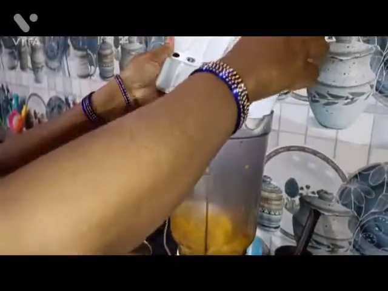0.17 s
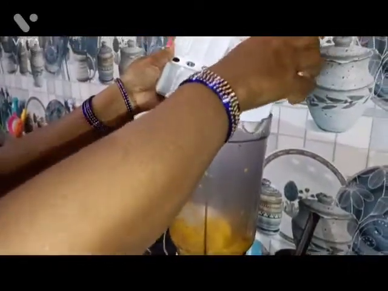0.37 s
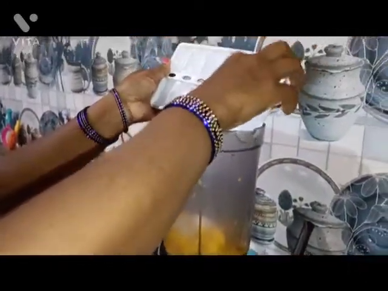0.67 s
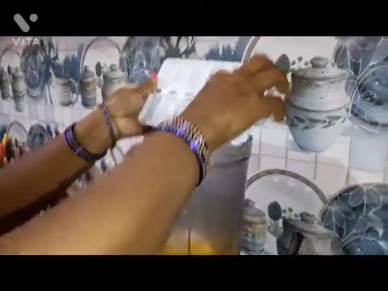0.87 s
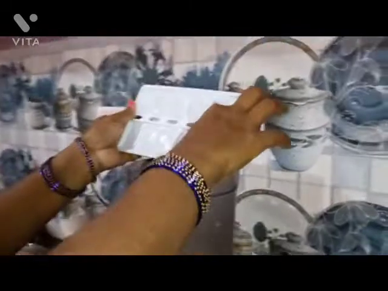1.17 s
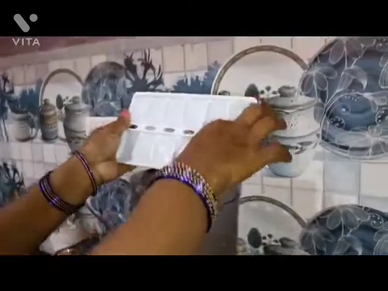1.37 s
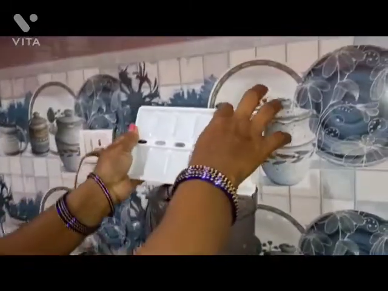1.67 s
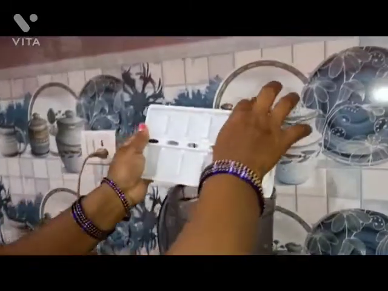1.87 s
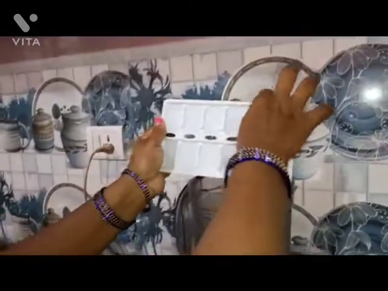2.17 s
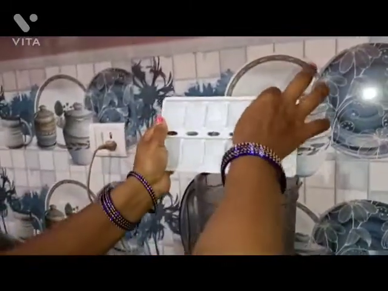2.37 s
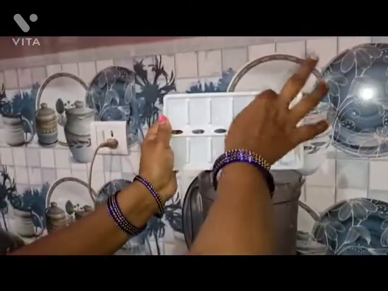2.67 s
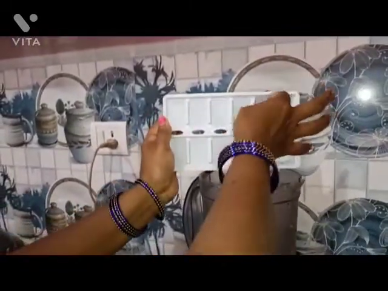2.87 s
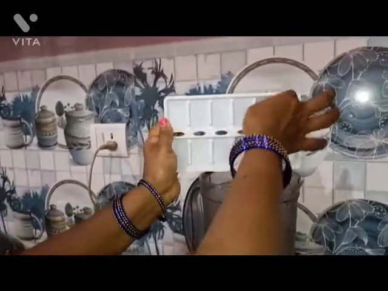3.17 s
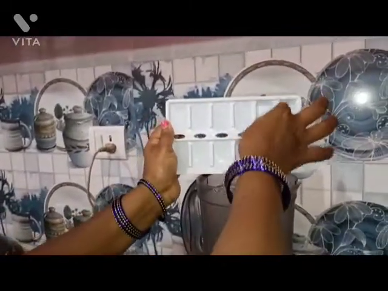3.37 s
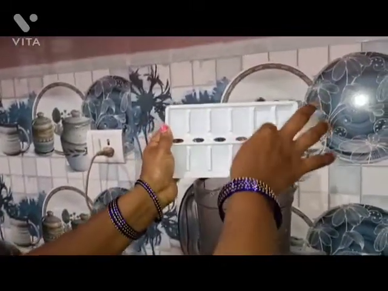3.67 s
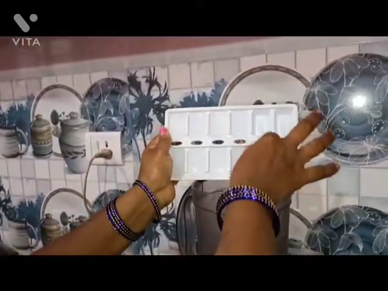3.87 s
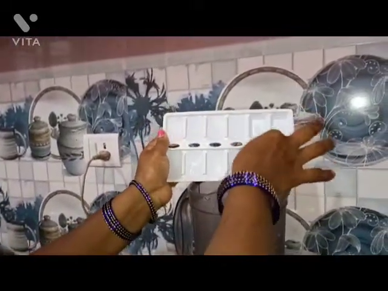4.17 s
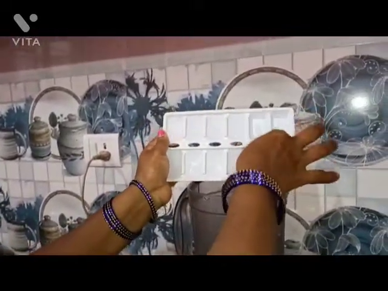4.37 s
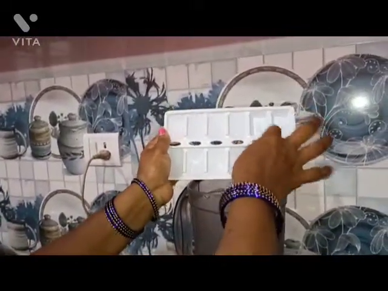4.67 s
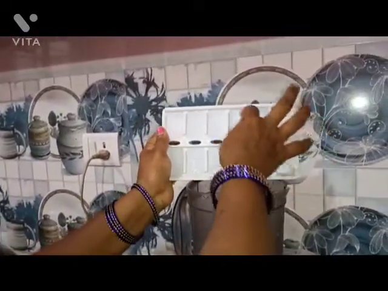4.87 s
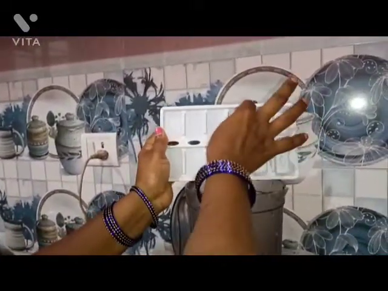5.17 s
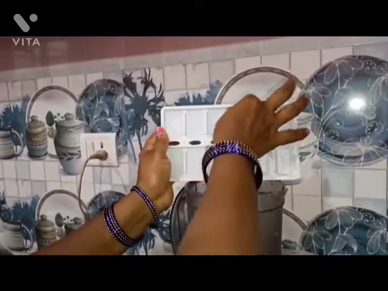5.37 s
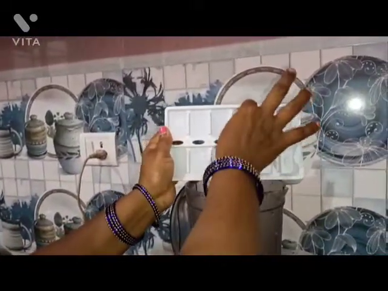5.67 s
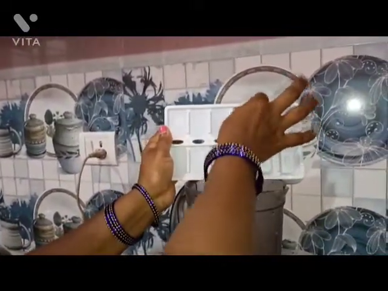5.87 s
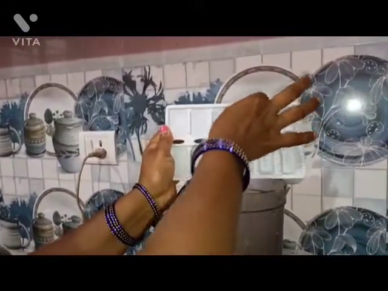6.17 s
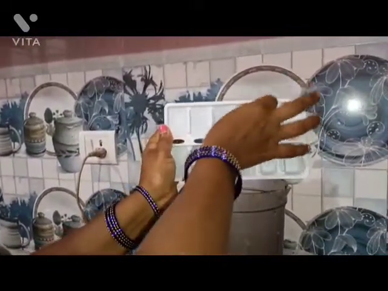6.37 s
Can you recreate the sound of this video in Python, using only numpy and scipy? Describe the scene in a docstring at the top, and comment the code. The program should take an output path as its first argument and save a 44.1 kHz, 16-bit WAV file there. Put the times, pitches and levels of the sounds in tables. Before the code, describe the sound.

Ice cubes clatter into a plastic blender jar in four short, bright bursts. Between them, hands creak and rustle on a plastic ice tray, which snaps sharply as it is twisted and the ice lets go. Midway, cubes touch the steel blade with a faint, thin ring. Small ticks and creaks finish it. A phone microphone picks up the tiled kitchen's echo and a low hum.

```python
"""Ice cubes crack out of a plastic tray and clatter into a plastic blender jar in a tiled kitchen.
Each blow is a short chatter of contacts that rings jar and cube; the tiles add a bright tail.
Two cubes touch the steel blade and leave a thin ring. Hands creak and rustle on the tray
over a low household hum. A phone with two unlike ports listens."""
import sys
import numpy as np
from scipy import signal
from scipy.fft import rfft, irfft, next_fast_len
from scipy.io import wavfile
from scipy.ndimage import uniform_filter1d

SR = 44100
rng = np.random.default_rng(int(sys.argv[2]) if len(sys.argv) > 2 else 0)


def transcribe(u):
    """Save the signal u as a 16-bit wav file named by the first command-line argument.

    u: samples, shape (n,) or (channels, n), limited to [-1, 1]; the rate is SR.
    q: integer samples, one column per channel.
    """
    v = np.clip(np.atleast_2d(u).T, -1, 1)
    q = np.round(v * 32767).astype(np.int16)
    wavfile.write(sys.argv[1], SR, q)


N = 286958
LEAD_SAMPLES = 4410  # run-in before time zero

# Jar and ice modes, one list per family: air boom, hollow knock, body, wall, brittle crack, sharp tick.
# Each row: frequency in Hz, width in Hz, level within the family in dB.
MODE_FAMILIES = [
    [(491, 28, -2.5), (233, 60, -18.5)],
    [(1109, 77, 3.5), (1195, 174, 1)],
    [(1506, 260, -3.5), (1890, 250, 0.5), (2014, 197, -1), (2214, 218, 3.5)],
    [(2670, 310, -1.5), (2940, 450, 7), (3470, 500, -3.5), (4700, 1800, -18.5)],
    [(5720, 880, -9.5), (5970, 760, 2.5), (6760, 1200, 4)],
    [(9220, 1440, 9.5), (10170, 2800, 4.5), (14550, 2600, -6)],
]
# Cubes striking the jar and each other. Each row: start in seconds, strength in dB, ring in Hz,
# knock, body and crack in dB relative to strength, chatter time in ms, room send in dB.
CUBE_HITS = [(-.015, -10.5, 3820, -20, -16, -9, 1.7, 0.5), (0.1172, -3.5, 3670, -12.5, -8, -10, 2.6, -0.5),
             (0.1216, -7, 3080, -11.5, -31.5, -25, 2.9, 1), (0.2061, -7, 2170, -17.5, -10, -9.5, 4.1, 1.5),
             (0.2223, -17, 2770, -40.5, -27.5, -14, 2.6, 1), (1.3925, -1, 3110, -23, -15.5, -22, 4, -0.5),
             (1.4133, -10.5, 3800, -41, -50, -6.5, 3, 4.5), (1.4228, -18, 3550, -14, -22, -16, 3.7, 4),
             (1.4344, -14, 2870, -27, -40, -6.5, 8, 3), (1.439, -14, 3600, -36, -25.5, -7.5, 5.2, 4),
             (1.4522, -13.5, 3900, -12.5, -11, -24, 2, 1.5), (1.4621, -2, 3230, -33, -18.5, -21, 4.4, 1),
             (1.4778, -10, 3870, -40, -17, -31, 6.3, 1), (1.483, -18, 3760, -8, -3.5, -0.5, 5.6, -12),
             (1.4899, -7, 3650, -55, -20, -39, 1.3, -4.5), (1.5194, -23, 3900, -34, -15, -24, 1.9, 0),
             (1.5413, -26, 3740, -42, -9, -27, 1.6, 10.5),
             (1.5702, -13.5, 3000, -18, -11.5, -19.5, 3.5, 2.5),
             (1.6444, -21.5, 3200, -7, -8.5, -15.5, 1.8, 0.5),
             (1.927, -20.5, 3720, -31, -19, -19, 1.5, -7.5), (3.2942, -7, 2780, -16.5, -14, -19, 2.3, 0.5),
             (3.327, -7, 3060, -27, -11, -17, 5.4, -0.5), (3.3564, -25, 3080, -30, -15, -26, 2.6, -7),
             (3.4023, -6, 3050, -33, -9.5, -56, 2.4, -5), (3.4086, -33.5, 3000, -5.5, -26, 2, 1.6, -5),
             (3.696, -37.5, 3150, -22.5, -16, -27, 2.1, -9),
             (4.5426, -7.5, 2850, -18.5, -29, -14.5, 6.1, -6), (4.555, -20, 2520, -31, -5, -6, 2, 9.5),
             (4.5721, 0.5, 3300, -25, -19.5, -59, 2.5, 0.5), (4.5855, -5, 2960, -19, -14.5, -44, 3.3, -21),
             (4.601, -10, 2950, -29, -7.5, -16, 1.6, -1.5), (4.663, -10.5, 3080, -30, -42, -30, 0.97, -3),
             (4.7406, -25.5, 3980, -43, -19, -27, 3.3, 5.5), (4.9414, -27.5, 3670, -21, -29, -41, 3.2, -3),
             (4.99, -38, 3490, -18, -26, -16, 2.3, -4), (5.0075, -21, 3670, -24.5, -29, -30, 5.1, -7)]
# Twisted tray snapping as ice lets go. Each row: as in CUBE_HITS.
TRAY_SNAPS = [(0.491, -40.5, 3780, -7, -19, -3.5, 4, 8.5), (0.871, -44.5, 2440, -7, -28.5, -14, 4.2, -1),
              (1.301, -8, 3700, -21, -16.5, -9.5, 7.8, 1.5), (1.3112, -7, 4770, -29, -15.5, -11, 0.47, -1),
              (2.0804, -42, 3750, -26, -22, -10, 2.9, -9), (2.42, -40.5, 3630, -23, -25, -25, 5.8, 0),
              (2.7423, -43.5, 3660, -22, -9.5, -4.5, 6.7, 9.5), (3.1178, -36, 2540, -25, -16, -16, 3.6, 3),
              (3.1662, -12, 3310, -21, -15, -45.5, 1, -8), (3.1708, -10.5, 3370, -22, -13.5, -43, 0.89, -4),
              (3.189, -34, 3770, -35, -39, -2, 11, 0.5), (4.2488, -32.5, 3620, -23, -33, -7.5, 4.1, -1.5),
              (4.3899, -40, 3520, -19, -24, -20, 2.5, 3), (4.4394, -10, 3220, -19, -27, -13.5, 1.9, -2.5),
              (5.1627, -35, 3800, -42, -35, -11.5, 3.1, 3.5), (5.3194, -45, 3920, -30, -25, -6, 3.7, 1),
              (5.517, -41.5, 3700, -15, -28, -19, 4.9, -11), (5.685, -37, 2360, -34, -7, -38, 2.7, -11),
              (5.7014, -27.5, 2420, -39, -18, -42, 6.2, 3), (5.9628, -23.5, 3400, -22, -20, -26, 2.3, -8.5),
              (5.979, -42, 3640, -27, -22, -7, 1.9, 5), (6.1692, -33.5, 2600, -23, -18, -25, 6.8, 2.5),
              (6.2727, -31, 3040, -29, -11.5, -33, 5.8, 4.5), (6.3203, -28, 2420, -20, -11, -39, 8, 3),
              (6.426, -35.5, 2890, -13, -32, -17, 3.5, -4.5)]
# Tiled room decay. Each row: frequency in Hz, T60 in seconds.
ROOM_T60_S = [(250, 1), (660, 0.56), (1740, 0.65), (4590, 0.67), (8000, 0.58), (12100, 0.41)]
# Hum spectrum. Each row: frequency in Hz, relative density in dB.
HUM_SPECTRUM_DB = [(12, -16), (45, -6.5), (107, -2), (172, -10), (255, -2), (367, -8), (459, -7),
                   (825, -12.5), (1030, -9.5), (1330, -15), (3440, -19), (5380, -27.5), (7520, -35.5),
                   (12100, -36), (16000, -38.5)]
# Hum stereo image. Each row: frequency in Hz, left-right correlation.
HUM_CORRELATION = [(25, 0.87), (60, 0.96), (400, 0.92), (800, 0.27), (1500, 0.084), (4000, 0.054),
                   (9000, 0.9)]
# Appliance tones. Each row: frequency in Hz, width in Hz, level in dB.
DRONES = [(25.4, 14, -63.5), (86, 2.4, -64), (246.5, 11.5, -57.5), (438.5, 126, -62)]
# Grip shifts on the tray. Each row: peak time, swell and fade in seconds, creak and rustle in dB.
GRIPS = [(0.502, 0.056, 0.33, -43, -41.5), (0.872, 0.0053, 0.05, -71, -48), (1.09, 0.3, 1, -57.5, -57.5),
         (1.28, 0.045, 0.25, -50.5, -51), (2.076, .015, 0.17, -61, -62.5), (2.29, .05, .9, -60, -68),
         (2.57, .3, 0.11, -56.5, -68), (2.752, 0.038, 0.63, -52, -66.5), (3.13, 0.053, 0.21, -45, -56),
         (3.7, 0.022, 0.15, -47, -65), (4.249, 0.0075, 0.12, -41, -38), (4.42, 0.14, 0.13, -50, -60),
         (5.166, 0.017, 0.19, -48.5, -56), (5.364, 0.13, 0.14, -54.5, -55), (5.52, 0.022, .05, -63, -56),
         (5.69, 0.023, 0.26, -42.5, -62), (5.79, .04, 0.12, -59, -80), (5.845, .01, 0.055, -72, -65),
         (5.964, 0.0062, 0.14, -46, -37.5), (6.03, 0.059, 0.22, -83, -52), (6.25, 0.35, 1, -50, -63.5)]
# Creak and dry rustle spectra. Each row: frequency in Hz, relative density in dB.
CREAK_SPECTRUM_DB = [(1000, -9), (1800, -4.5), (3200, -1.5), (4500, -7), (7000, -14), (9000, -65)]
RUSTLE_SPECTRUM_DB = [(3000, -31), (6000, 14.5), (9000, 13), (13000, 10.5), (15300, 6), (16000, -19)]
# Cubes touching the blade. Each row: start in seconds, level in dB.
BLADE_HITS = [(3.328, -34), (3.404, -33)]
# Steel blade modes. Each row: frequency in Hz, width in Hz, relative level in dB.
BLADE_MODES = [(3105, 3.2, -1), (3150, 5, -3)]
# Port mismatch. Each row: frequency in Hz, left over right in dB.
PORT_BALANCE_DB = [(60, -2.5), (110, 2), (200, -0.5), (380, -2), (700, -1.5), (1290, -1.5), (2380, 6.5),
                   (4400, 11.5), (8120, -2), (15000, 4.5)]
# Port cavity response with a notch. Each row: frequency in Hz, gain in dB.
PORT_CAVITY_DB = [(5500, -4), (6700, -4), (7400, -10.5), (8300, 0.5), (14000, -3), (15600, -10)]


def gain(db):
    return 10 ** (np.asarray(db) / 20)


def unit_rms(x):
    return x / np.sqrt(np.mean(x ** 2) + 1e-20)


def unit_energy(x):
    return x / np.linalg.norm(x, axis=-1, keepdims=True)


def lookup(table, hz):
    """Interpolate over log frequency."""
    table_hz, values = np.transpose(table)
    return np.interp(np.log(hz + 1), np.log(table_hz + 1), values)


def equalise(x, table, db_scale=1):
    """Filter by a (Hz, dB) table."""
    size = next_fast_len(x.shape[-1])
    response = gain(db_scale * lookup(table, np.fft.rfftfreq(size, 1 / SR)))
    return irfft(rfft(x, size) * response, size)[..., :x.shape[-1]]


def highpass(x, hz):
    return signal.sosfilt(signal.butter(5, hz, "high", fs=SR, output="sos"), x)


def mode(hz, width_hz, t):
    return np.sin(2 * np.pi * hz * t) * np.exp(-np.pi * width_hz * t)


def blow(ring_hz, ring_ms, chatter_ms):
    """Uneven contacts swell, die and ring the modes. One unit-energy stereo signal per family."""
    t = np.arange(2048) / SR
    contact_ms, rise_ms = t[:1024] * 1000, 0.4
    force = (1 - np.exp(-contact_ms / rise_ms)) * np.exp(-contact_ms / chatter_ms)
    size, chance = rng.standard_normal((2, 2, 1024))
    shared, far_only = size * (abs(chance) > 1) * force
    contacts = np.array([shared, 0.4 * shared + 0.6 * far_only])  # near port, far port
    families = np.zeros((len(MODE_FAMILIES), len(t)))
    for family, modes in zip(families, MODE_FAMILIES):
        for hz, width_hz, db in modes:
            spot = rng.standard_normal()  # strike point weights and shifts the mode
            family += gain(db + 2 * spot) * mode(hz * (1 + 0.02 * spot), width_hz, t)
    piece_ring = mode(ring_hz, 1000 / np.pi / ring_ms, t)
    families[3] = unit_energy(families[3]) + gain(11) * unit_energy(piece_ring)  # wall + struck piece
    return unit_energy(signal.fftconvolve(families[:, None], contacts[None], axes=2))


def clatter(hits, base_ring_ms, boom_re_knock_db, boom_loss_db_per_s):
    """Series of blows. Returns direct stereo and three room sends, used in turn."""
    samples = LEAD_SAMPLES + N + SR
    direct, sends = np.zeros((2, samples)), np.zeros((3, samples))
    for k, (start_s, db, ring_hz, knock_db, body_db, crack_db, chatter_ms, send_db) in enumerate(hits):
        ring_ms = base_ring_ms - 0.03 * db  # gentler blows ring longer
        boom, knock, body, wall, crack, tick = blow(ring_hz, ring_ms, chatter_ms)
        boom_db = knock_db + boom_re_knock_db - boom_loss_db_per_s * start_s
        # Small pieces radiate no bass.
        bright = gain(body_db) * highpass(body, 1300) + gain(-11) * highpass(wall, 2100)
        bright += gain(crack_db) * (highpass(crack, 4200) + gain(-7) * highpass(tick, 7000))
        low = gain(boom_db) * highpass(boom[0], 215) + gain(knock_db) * highpass(knock, 940)
        strength = gain(db) * np.sqrt(0.01 * SR)  # unit energy to rms over 10 ms
        at = LEAD_SAMPLES + round(start_s * SR)
        span = slice(at, at + low.shape[1])
        direct[:, span] += strength * (bright + low)
        sends[k % 3, span] += strength * gain(send_db) * (bright + gain(-3.5) * low)[0]
    return direct, sends


def cubes_in_jar():
    """Cubes hit the jar and each other; the air boom dulls as the jar fills."""
    return clatter(CUBE_HITS, base_ring_ms=0.77, boom_re_knock_db=-10.5, boom_loss_db_per_s=3.5)


def kitchen(sends):
    """Tile echoes: sparse taps of random sign, each band dying at its own rate."""
    t = np.arange(SR) / SR
    slots = np.arange(130, SR - 12, 12)
    at = slots + rng.integers(0, 12, (3, 2, len(slots)))
    taps = np.zeros((3, 2, SR))
    np.put_along_axis(taps, at, rng.choice([-1., 1.], at.shape), 2)
    taps[:, 1] = 0.15 * taps[:, 0] + 1.85 * taps[:, 1]
    hz, frame_s, bands = signal.stft(taps, SR, nperseg=256)
    bands = bands * gain(-60 * frame_s / lookup(ROOM_T60_S, hz)[:, None])
    tail = signal.istft(bands, SR, nperseg=256)[1][..., :SR]
    build_up = 1 - np.exp(-t / 0.0027)
    facing_wall = 0.96 * np.exp(-((t - 0.016) / 0.0062) ** 2)
    clumps_db = 0.5 * unit_rms(uniform_filter1d(rng.standard_normal((3, 1, SR)), size=260))
    tail = unit_energy(tail * (build_up + facing_wall) * gain(clumps_db))
    return signal.fftconvolve(sends[:, None], tail, axes=2).sum(0)


def household_hum():
    """Patchy low noise plus fuzzy appliance drones."""
    t, hz = np.arange(N) / SR, np.fft.rfftfreq(1024, 1 / SR)
    left_re, left_im, side_re, side_im, patches = rng.standard_normal((N // 256 + 5, 513, 5)).T
    patches_db = 1.8 * unit_rms(uniform_filter1d(uniform_filter1d(patches, 10, axis=0), 12, axis=1))
    correlation = lookup(HUM_CORRELATION, hz)[:, None]
    left = left_re + 1j * left_im
    right = correlation * left + np.sqrt(1 - correlation ** 2) * (side_re + 1j * side_im)
    bands = np.array([left, right]) * gain(lookup(HUM_SPECTRUM_DB, hz)[:, None] + patches_db)
    out = gain(-49.5) * unit_rms(signal.istft(bands, nperseg=1024, noverlap=768)[1][:, :N])
    for drone_hz, width_hz, db in DRONES:
        pole = np.exp(-np.pi * width_hz / SR)
        waver = signal.lfilter([1], [1, -2 * pole, pole ** 2], rng.standard_normal((2, N)))
        phase = 2 * np.pi * drone_hz * t
        out += gain(db) * unit_rms(waver[0] * np.cos(phase) + waver[1] * np.sin(phase))
    return out


def hands():
    """Grainy stick-slip of skin and flexing plastic; each grip swells and fades."""
    grid_s = np.arange(0, N / SR, 0.001)
    envelopes, out = np.zeros((2, len(grid_s))), np.zeros((2, N))
    for peak_s, swell_s, fade_s, *levels_db in GRIPS:
        since_s = grid_s - peak_s
        shape_db = 30 * np.where(since_s < 0, since_s / swell_s, -since_s / fade_s)
        envelopes += gain(np.array(levels_db)[:, None] + shape_db)
    for envelope, spectrum in zip(envelopes, (CREAK_SPECTRUM_DB, RUSTLE_SPECTRUM_DB)):
        noise = rng.standard_normal((3, N))
        slip_db = 2.5 * np.minimum(rng.exponential(1, N), 4)
        slipping = rng.random(N) < 0.03
        grains = noise * (0.39 + gain(slip_db) * slipping)
        friction = unit_rms(equalise(grains[:2] + 0.54 * grains[2], spectrum))
        out += np.interp(np.arange(N) / SR, grid_s, envelope) * friction
    return out


def tray_snaps():
    """The twisted tray snaps and ticks as ice lets go."""
    return clatter(TRAY_SNAPS, base_ring_ms=0.13, boom_re_knock_db=-4, boom_loss_db_per_s=1)


def blade_ring():
    """Cubes touch the steel blade; two close modes ring thinly."""
    t, out = np.arange(SR) / SR, np.zeros(LEAD_SAMPLES + N + SR)
    steel = sum(gain(db) * mode(hz, width_hz, t) for hz, width_hz, db in BLADE_MODES)
    for start_s, db in BLADE_HITS:
        at = LEAD_SAMPLES + round(start_s * SR)
        out[at:at + SR] += gain(db) * steel
    return out


def scene():
    """Blows, their bounce off the counter, room, hands and hum."""
    cubes, cube_sends = cubes_in_jar()
    snaps, snap_sends = tray_snaps()
    direct, sends = cubes + snaps, cube_sends + snap_sends
    sends[0] += blade_ring()  # heard through the room only
    counter = 0.25 * np.array([np.roll(direct[0], 201), np.roll(direct[1], 223)])
    heard = slice(LEAD_SAMPLES, LEAD_SAMPLES + N)
    return (direct + counter)[:, heard] + kitchen(sends)[:, heard] + hands() + household_hum()


def record(dry):
    """Phone: port colour, abrupt stop just before the end, soft overload, band limit."""
    stop_s, stop_db_per_s, cutoff_hz = 6.452, 1400, 15700
    ports = np.array([equalise(dry[0], PORT_BALANCE_DB, 0.5), equalise(dry[1], PORT_BALANCE_DB, -0.5)])
    ports = equalise(ports, PORT_CAVITY_DB)
    after_s = np.arange(N) / SR - stop_s
    ports[:, after_s > 0] *= gain(-22 - stop_db_per_s * after_s[after_s > 0])
    lowpass = signal.firwin(255, cutoff_hz, window=("kaiser", 9), fs=SR)
    return signal.oaconvolve(np.tanh(ports), lowpass[None], "same")


dry = scene()
out = record(dry)
transcribe(out)
```